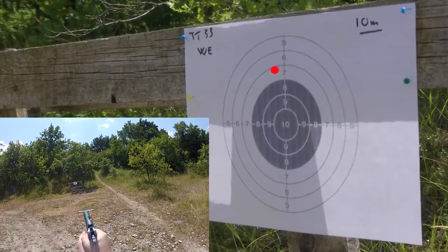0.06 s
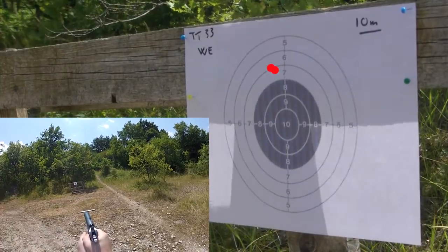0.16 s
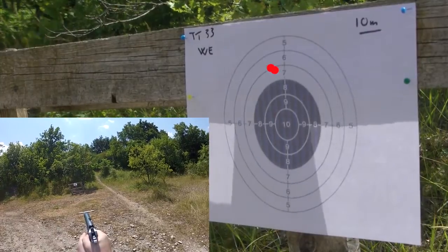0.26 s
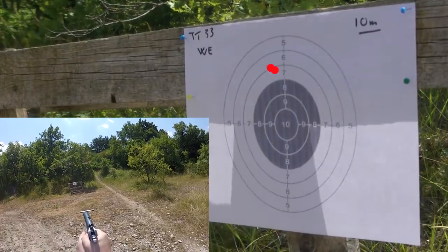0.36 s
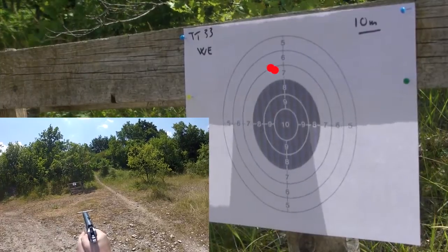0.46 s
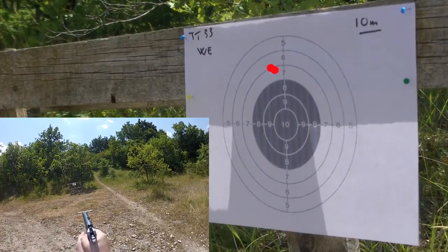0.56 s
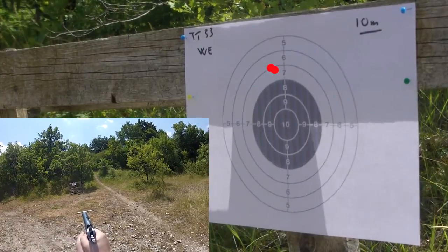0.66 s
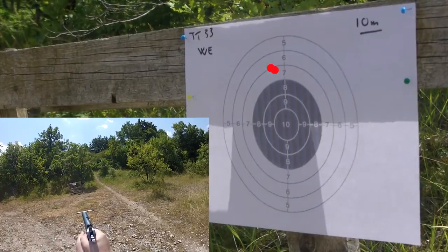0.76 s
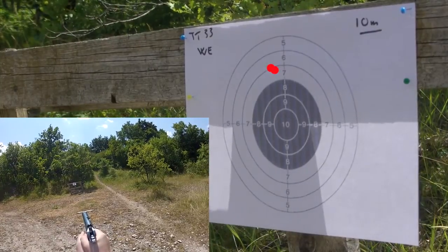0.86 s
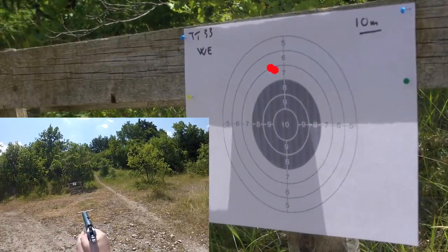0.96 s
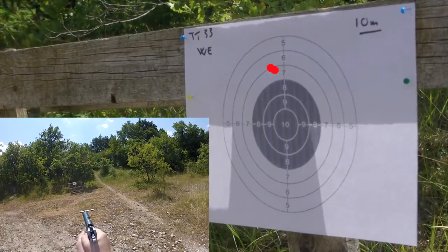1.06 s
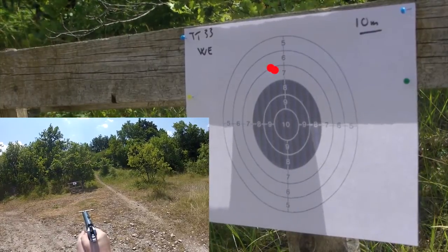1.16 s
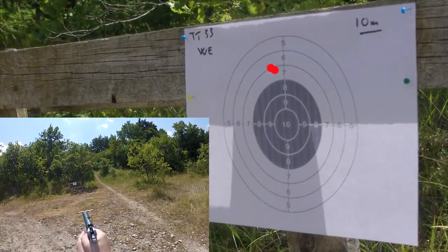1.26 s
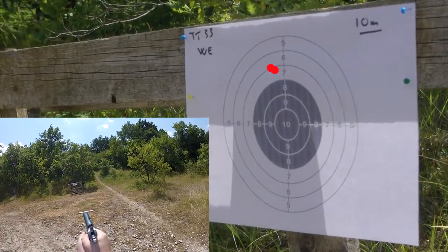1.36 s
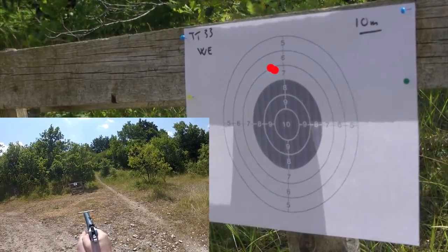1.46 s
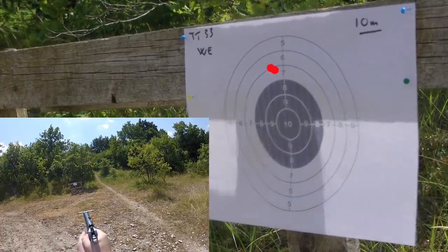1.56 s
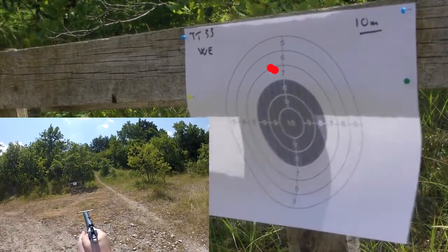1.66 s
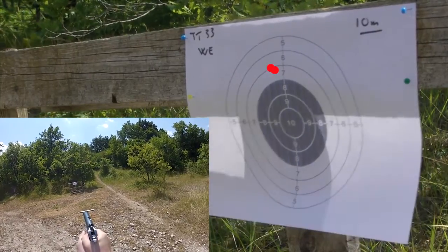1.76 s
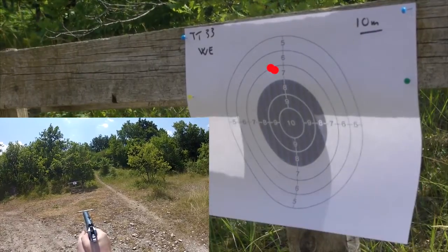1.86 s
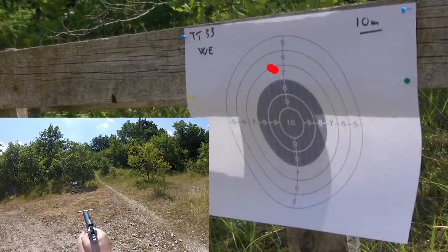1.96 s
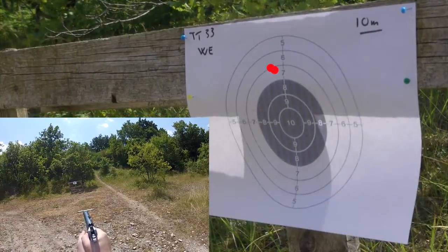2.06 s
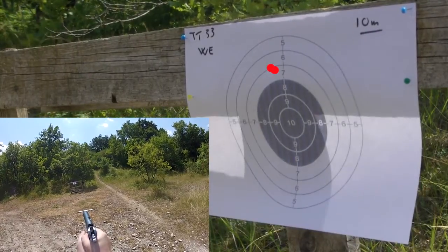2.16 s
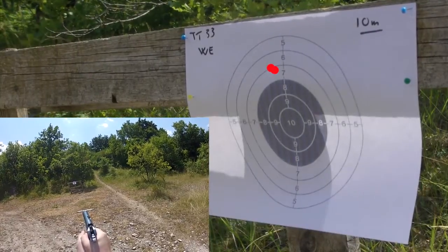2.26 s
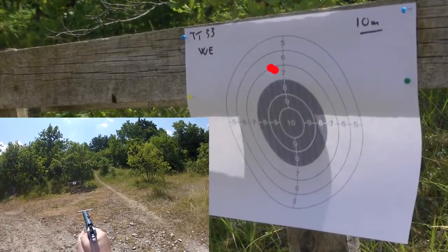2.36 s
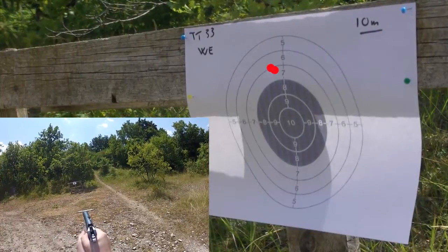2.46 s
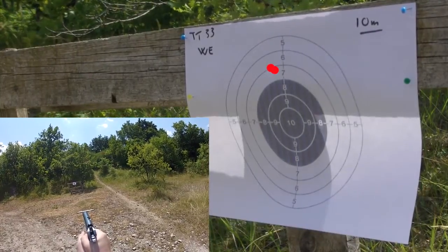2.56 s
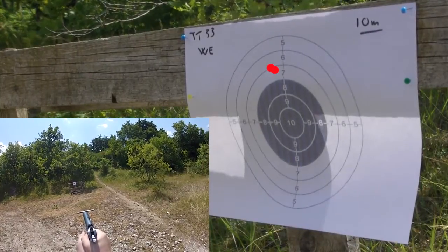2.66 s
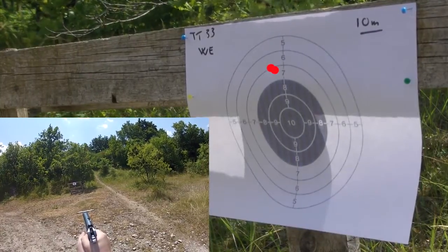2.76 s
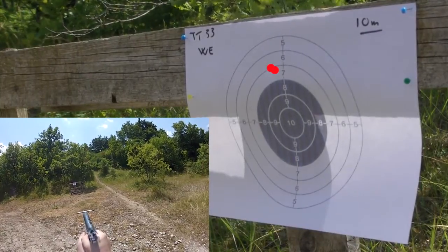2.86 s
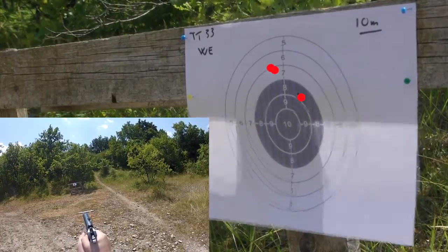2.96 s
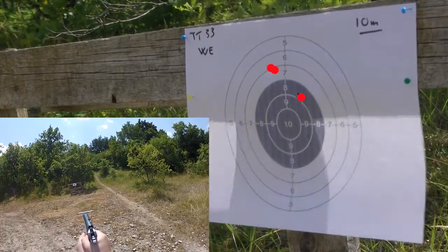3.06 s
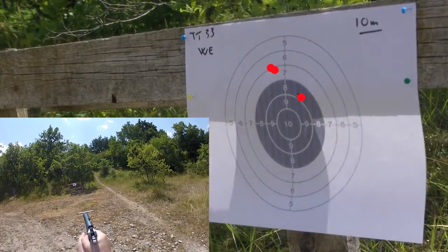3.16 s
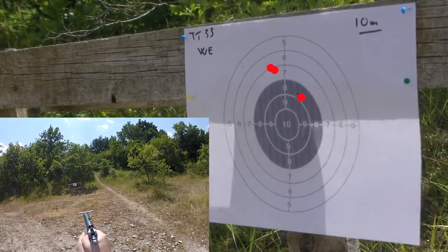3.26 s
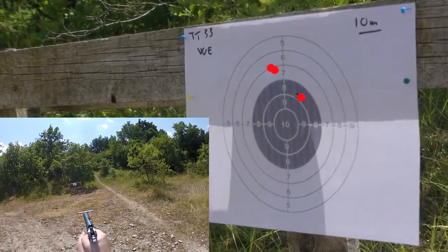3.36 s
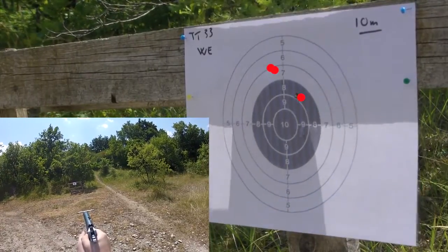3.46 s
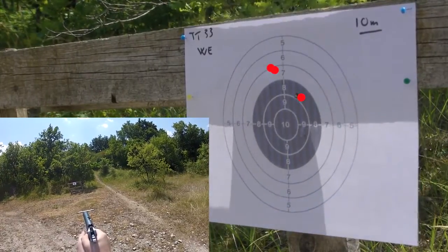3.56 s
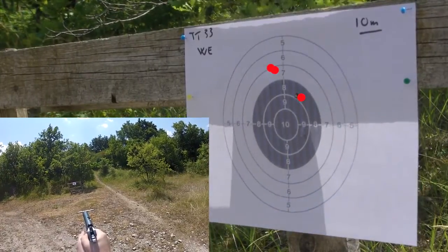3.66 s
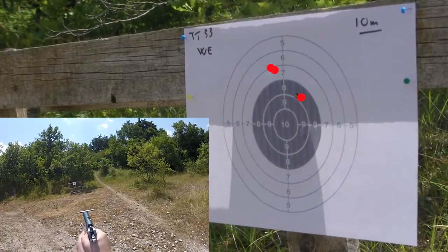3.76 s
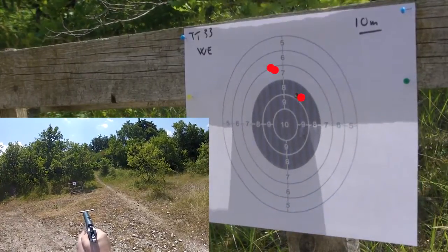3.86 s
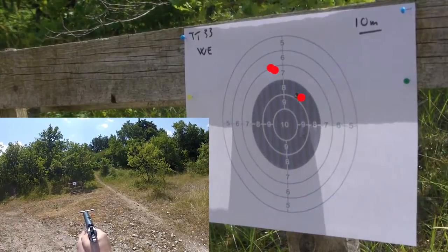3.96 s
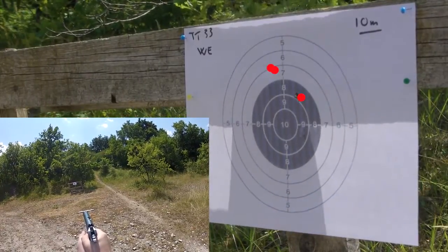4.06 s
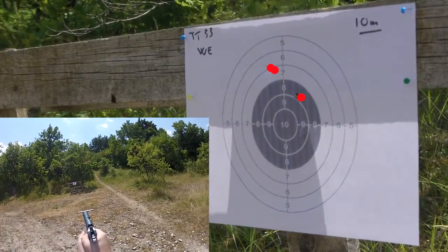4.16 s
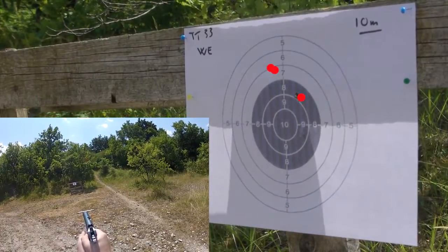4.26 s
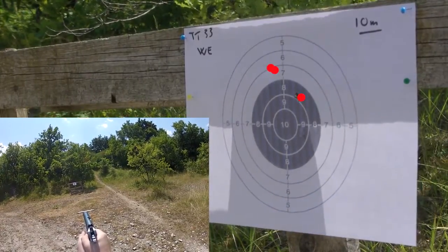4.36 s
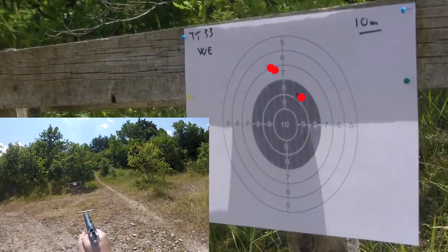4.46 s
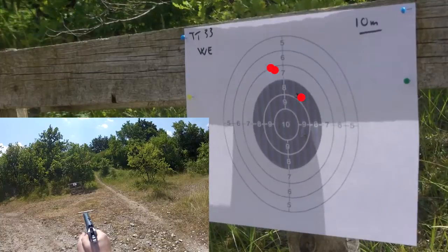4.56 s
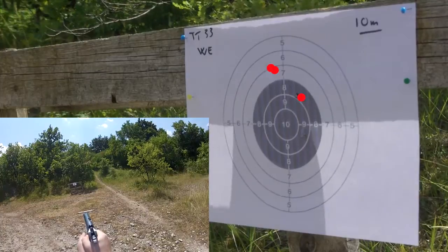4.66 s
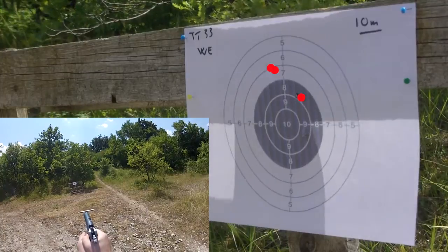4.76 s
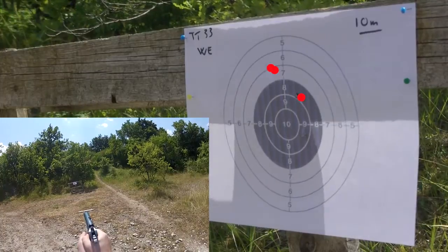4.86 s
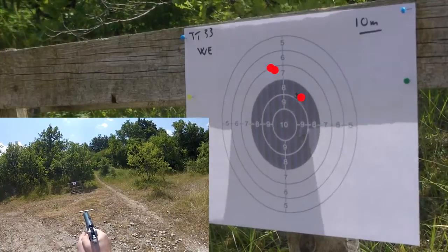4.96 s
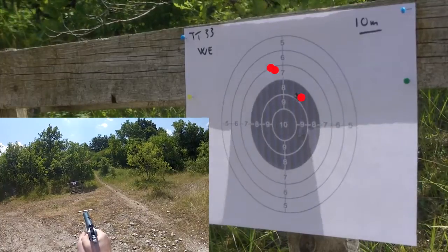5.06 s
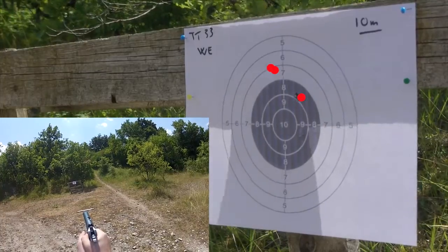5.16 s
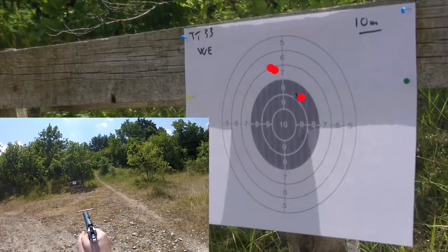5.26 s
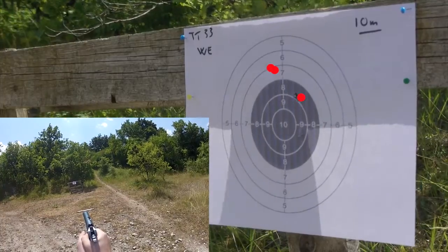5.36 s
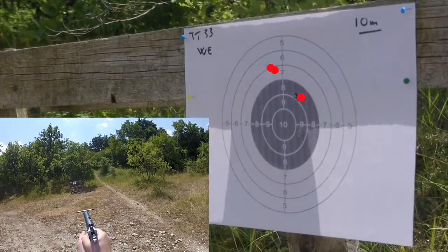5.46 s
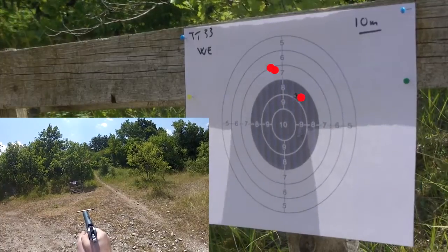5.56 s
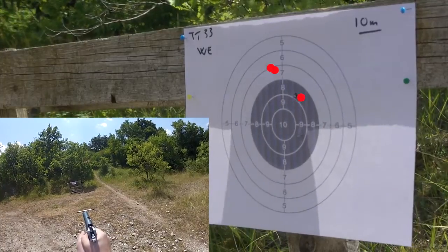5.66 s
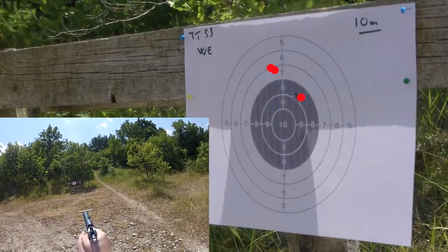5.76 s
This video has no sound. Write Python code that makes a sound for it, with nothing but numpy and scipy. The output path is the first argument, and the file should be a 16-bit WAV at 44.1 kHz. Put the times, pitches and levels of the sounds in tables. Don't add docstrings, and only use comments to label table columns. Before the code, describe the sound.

A gas-powered toy pistol snaps four times in dry scrub; pellets crack against a board three times, with wind rumble and rustling fragments between.

```python
import sys
import numpy as np
from scipy import signal
from scipy.fft import rfft, irfft
from scipy.io import wavfile
from scipy.ndimage import uniform_filter1d, minimum_filter1d

SR = 44100
rng = np.random.default_rng(int(sys.argv[2]) if len(sys.argv) > 2 else 0)


def how_loud(loudness_db):
    steps = np.asarray(loudness_db, float) / 20
    return 10 ** steps


def to_wav(sig):
    pcm = np.clip(np.atleast_2d(sig), -1, 1) * 32767
    pcm = np.round(pcm).astype(np.int16)
    wavfile.write(sys.argv[1], SR, pcm.T)


N = 255780

# freq_hz, density_db
FIELD_SIDE = [(35, -37.5), (60, -16), (160, -3), (250, -5), (323, -3), (785, -5.5), (2900, -21),
              (5590, -29), (9570, -30.5), (14200, -36), (16000, -35)]
FIELD_MID = [(35, -23), (60, -3.5), (156, -2.5), (268, -20.5), (323, -11), (749, -6), (1340, -9.5),
             (1820, -12.5), (12700, -22), (16000, -39.5)]
# freq_hz, level_db
WHINE = [(10490, -78), (13125, -76.5), (13965, -82)]
# freq_hz, density_db
HISS = [(120, -61), (200, -6.5), (289, -6.5), (366, -11), (401, -6.5), (1500, -13.5), (1680, -14),
        (4350, -14.5), (16000, -30)]

# time_s, level_db, left_minus_right_db
WIND = [(.15, -51, 7), (.5, -46.5, 12), (.67, -60, 7.5), (.85, -43.5, 1.5), (1.26, -46.5, 7),
        (1.36, -62, 9), (1.9, -50, 2.5), (2.32, -59, 4.5), (2.55, -44.5, 9), (2.93, -48.5, 4),
        (3.05, -40.5, 11), (3.38, -46.5, 13), (3.75, -51.5, 4), (4.25, -60.5, 4), (4.72, -50, 8),
        (5.0, -51.5, 3.5), (5.45, -60, 5), (5.8, -57, 2)]
# freq_hz, density_db
WIND_COLOUR = [(15, -19), (28, -7), (45, 0), (90, 0.5), (160, -6), (300, -25), (600, -85)]
# freq_hz, density_db
HEAVE = [(10, -6.5), (22, -4.5), (40, -0.5), (70, -18.5), (140, -70)]
# time_s, left_size, right_size, freq_hz, length_cycles
EDDIES = [(0.371, 0.077, 0.0016, 81, 0.92), (4.048, 0.011, 0.0039, 50.6, 1.5),
          (3.039, 0.016, 0.00098, 138, 3.5), (1.14, 0.038, 0.0035, 60.4, 1.3), (.86, 0.026, 0.029, 55, 1.4),
          (1.083, 0.046, -0.025, 253, 1.6), (1.287, 0.13, -0.079, 149, 0.8),
          (1.556, 0.027, -0.02, 180, 4.2), (2.641, .05, -0.011, 80, 1.5), (3.321, 0.027, 0.0091, 49.3, 1.4),
          (3.43, 0.023, -0.016, 55, 1.1), (3.578, 0.045, -0.031, 178, 1.6),
          (3.627, 0.033, -0.022, 164, 2.2), (3.756, .096, -.063, 165, 1.07),
          (3.845, 0.05, -0.029, 160, 0.59), (3.909, 0.074, -0.057, 142, 2.2),
          (4.947, .015, -0.036, 100, 1.6), (5.22, .02, -0.026, 120, 1.4), (5.6, 0.028, -0.017, 112, 2.7),
          (5.683, 0.091, -0.048, 140, 1.1)]
GUSTS_DB, BUFFET_DB, VEER_DB = 1, 3, 2

# start_s, rms_db, centre_hz, t60_s, left_minus_right_db
LEAVES = [(0.16, -37, 3500, .015, -3), (0.374, -47, 3220, 0.035, 8), (1.4205, -33.5, 3860, 0.0082, -6),
          (1.6195, -24.5, 7660, 0.0047, -6), (1.623, -31, 4050, 0.01, -2), (1.628, -36, 8100, 0.052, -2),
          (2.101, -45, 8800, 0.034, -6), (2.231, -49, 7920, 0.013, 11), (3.018, -51, 11500, 0.0084, -22),
          (3.398, -61, 9800, .078, -10), (4.469, -24, 4060, 0.018, -2), (4.575, -38, 5950, 0.15, -6),
          (4.61, -25.5, 8140, 0.035, -4.5), (4.615, -40, 5870, 0.3, -3)]

# freq_hz, t60_s
SCRUB_DECAY = [(300, 0.05), (1000, 1), (3000, 0.56), (4600, 0.53), (5700, 0.52), (7000, 0.5), (9000, 0.44),
               (13000, 0.28)]
# freq_hz, density_db
SCRUB_COLOUR = [(180, -11), (300, -3.5), (537, -7), (1280, -4.5), (3350, 2.5), (5610, 5), (12100, -2.5),
                (16000, -14)]

# start_s, peak_db, pitch_hz, ground_bounce_db
STRIKES = [
    (.1282, 1.5, 7000, -11),
    (1.4673, .5, 8000, -24),
    (2.9599, 2.5, 8500, -11),
]
# start_s, peak_db, pitch_hz, ground_bounce_db
RETURNS = [
    (.1727, -5.5, 6500, -11),
    (1.5125, -12, 7000, -24),
    (3.0047, -11, 5000, -1),
]
# wood_ring_db, debris_db, debris_hz, debris_t60_s, dust_db
AFTER = [
    [(-17.5, -11, 5000, 0.0067, -38.5), (-28, -15, 7300, 0.0019, -41)],
    [(-37, -34, 4400, 0.0069, -34.5), (-41, -13.5, 8500, 0.0053, -58.5)],
    [(-22, -15.5, 3100, 0.015, -42), (-3.5, -9.5, 1300, 0.0057, -27)],
]
# freq_hz, level_db, t60_s
PLANK = [(1640, -3.5, 0.041), (2220, 0, 0.017), (2940, 7, 0.01), (3640, 4, 0.018), (4600, -44, 0.023),
         (6700, 0, 0.0056)]
# freq_hz, level_db, t60_s
POST = [(1100, -7.5, 0.019), (1770, -38, 0.026), (2145, -10.5, 0.032), (3640, -9, 0.023),
        (4360, -28, 0.029), (6940, -5.5, 0.0083)]

# start_s, level_at_target_db
FIRED = [
    (.0219, -20),
    (1.3024, -18),
    (2.8539, -17.5),
    (4.4477, -18),
]
# gas_strength_db, scrub_echo_db
SHOTS = [(-1.6, -31), (-0.2, -29), (-1, -30), (-0.2, -27)]
# freq_hz, density_db
REPORT = [(300, -24), (1200, -15.5), (2500, 1.5), (6000, 1), (9000, -3.5), (12500, -14.5), (16000, -29)]
# delay_s, freq_hz, decay_s
MUZZLE_PUSH = (0.00198, 460, 0.0025)
BREECH_PUSH = (.0079, 143, 0.0027)
GRIP = [(0.47, -0.83, -1, -0.8), (.47, -0.23, -0.82, -0.7), (0.25, -0.24, -1.05, -0.7),
        (0.81, -.55, -0.77, -0.71)]
# start_s, left_size, right_size, freq_hz, decay_s
JOLTS = [
    (.1283, 0.19, 0.37, 540, 0.00057),
    (4.451, -0.61, -0.23, 137, .005),
]
# delay_s, level_db, rise_s, hold_s, t60_s
ACTION = [
    (-.0118, -25, 0.00026, 0.0008, 0.01),
    (-.0060, -14, 0.0041, 0.0004, 0.0064),
    (0, 6, 0.0005, 0.00094, 0.002),
    (.0036, 2.5, 0.0012, 0.00072, 0.0033),
    (.0075, 3, 0.000067, 0.00035, 0.0035),
    (0.0099, 0.5, 0.00053, 0.00098, .008),
    (0.0147, -4.5, 0.00016, 0.0005, 0.012),
    (0.017, -23.5, 0.0026, 0.0026, 0.078),
    (.0005, -7.5, .001, .015, 0.014),
]
# freq_hz, density_db
GAS = [(260, -3), (450, -2.5), (607, -12), (1040, -5), (1560, -10), (1700, -10.5), (2260, -15),
       (2470, -8.5), (3230, -8), (5140, -1), (12800, -8), (16000, -57)]
# freq_hz, width_hz, level_db
SLIDE = [(1030, 250, -1.5), (1946, 230, 2), (2325, 410, 2.5), (2970, 58, -3.5), (3880, 220, -9.5),
         (4740, 83, -8), (5800, 85, -17), (5890, 110, -24)]


def evened(x):
    return x / np.sqrt(np.mean(x ** 2) + 1e-20)


def read(points, hz):
    f, value = np.transpose(points)
    return np.interp(np.log(hz + 1), np.log(f + 1), value)


def add(mix, start_s, sound):
    start = round(start_s * SR)
    part = mix[..., start:start + sound.shape[-1]]
    part += sound[..., :part.shape[-1]]


def coloured(points, size=N, channels=2):
    spectrum = rfft(rng.standard_normal((channels, size)))
    gain = how_loud(read(points, np.fft.rfftfreq(size, 1 / SR)))
    return evened(irfft(spectrum * gain, size))


def smooth_noise(count, size):
    return evened(uniform_filter1d(rng.standard_normal(count), size=size))


def wander(size):
    return evened(uniform_filter1d(uniform_filter1d(rng.standard_normal(N), size=size), size=size))


def ring(x, hz, width_hz):
    return signal.lfilter(*signal.iirpeak(min(hz, SR * .45), hz / width_hz, SR), x)


def swell(t, rise_s, hold_s, t60_s):
    fall_s = np.maximum(t - rise_s - abs(hold_s), 0)
    return np.clip(t / rise_s, 0, 1) * how_loud(-60 * fall_s / t60_s)


def ports(pair, same, lag_s=0.):
    same = np.clip(same, 0, 1)
    left = np.roll(pair[0], round(lag_s * SR))
    right = same * pair[0] + np.sqrt(1 - same ** 2) * pair[1]
    return np.array([left, right])


def field():
    side = how_loud(-44.5) * coloured(FIELD_SIDE, channels=1)[0]
    mid = how_loud(-56.5) * coloured(FIELD_MID, channels=1)[0] - 0.18 * side
    t = np.arange(N) / SR
    whine = sum(2 * np.sqrt(2) * how_loud(db) * np.sin(2 * np.pi * hz * t) for hz, db in WHINE)
    return np.array([mid + side + whine, mid - side])


def hiss():
    return how_loud(-53.5) * ports(coloured(HISS), 0.54)


def wind():
    time_s, level_db, pan_db = np.transpose(WIND)
    t = np.arange(N) / SR
    db = np.interp(t, time_s, level_db) + BUFFET_DB * wander(size=800) + GUSTS_DB * wander(size=3000)
    pan_db = np.interp(t, time_s, pan_db) + VEER_DB * wander(size=2500)
    rumble = ports(coloured(WIND_COLOUR), 0.66) * [[1], [-1]]
    heave = how_loud(-6.5) * ports(coloured(HEAVE), 0.94)
    out = (rumble + heave) * how_loud([db + pan_db / 2 + 1.0, db - pan_db / 2 + 3.5])
    for at_s, left, right, hz, cycles in EDDIES:
        u = (t - at_s) * hz
        out += np.outer([left, right], np.cos(2 * np.pi * u) * np.exp(-(2 * u / cycles) ** 2))
    return out


def leaves():
    out, t = np.zeros((2, N)), np.arange(8000) / SR
    for start_s, db, hz, t60_s, pan_db in LEAVES:
        hold_s = min(0.16 * t60_s, 0.0029)
        noise = coloured([(hz / 14, -22), (hz / 4, -5), (hz, 0), (hz * 1.7, -9), (hz * 2.6, -34)], size=len(t))
        grain = how_loud(2.5 * smooth_noise(len(t), 30))
        shape = grain * swell(t, .0003, hold_s, t60_s)
        add(out, start_s, ports(noise, 0.54) * shape * how_loud([[db + pan_db / 2], [db - pan_db / 2]]))
    return out


def echo(fade):
    hz, t, z = signal.stft(coloured(SCRUB_COLOUR, size=SR), SR, nperseg=256)
    t60_s = (fade * read(SCRUB_DECAY, hz))[:, None]
    tail = signal.istft(z * how_loud(-60 * t / t60_s), SR, nperseg=256)[1]
    count = tail.shape[1]
    lumps = how_loud(2 * smooth_noise(count, 200))
    onset = np.clip(np.arange(count) / SR / 0.0085, 0, 1)
    return ports(tail, 0.38) * lumps * onset


def ducking(x, knee_db=-31, share=0.91):
    hold, climb_db_per_s, lag = round(.08 * SR), 33, 1 / (.004 * SR)
    power = uniform_filter1d((x ** 2).mean(0), size=441, origin=220)
    power_db = 10 * np.log10(abs(power) + 1e-12)
    cut_db = share * np.maximum(power_db - knee_db, 0)
    held_db = -minimum_filter1d(-cut_db, 2 * (hold // 2) + 1, origin=hold // 2)
    climb_db = np.arange(N) * climb_db_per_s / SR
    cut_db = np.maximum(np.maximum.accumulate(held_db + climb_db) - climb_db, 0)
    return how_loud(-signal.lfilter([lag ** 2], [1, 2 * (lag - 1), (1 - lag) ** 2], cut_db))


def strike(board, db, hz, bounce_db, wood_db, debris_db, debris_hz, debris_t60_s, dust_db):
    t = np.arange(4000) / SR
    u = t * hz / .45
    crack = np.sin(2 * np.pi * hz * t) * u * np.exp(1 - u)
    crack = crack + how_loud(bounce_db) * np.roll(crack, 57)
    wood = sum(how_loud(d - 60 * t / t60_s) * np.sin(2 * np.pi * f * t) for f, d, t60_s in board)
    spectrum = [(400, -30), (debris_hz / 3, -9), (debris_hz, 0), (12000, -10), (17000, -40)]
    noise = ports(coloured(spectrum, size=len(t)), 0.65)
    debris = how_loud(debris_db) * swell(t, .0003, .001, debris_t60_s)
    dust = how_loud(dust_db) * swell(t, .001, .002, .18)
    whole = how_loud(db) * (crack + how_loud(wood_db) * wood + noise * (debris + dust))
    return signal.lfilter(*signal.butter(3, 800, "high", fs=SR), whole)


def report():
    t = np.arange(2500) / SR
    shape = how_loud(1) * swell(t, .001, .0015, .014)
    shape += how_loud(-5) * swell(t - .0045, .0004, .001, .02)
    shape += how_loud(-16) * swell(t - .009, .002, .006, .04)
    return ports(coloured(REPORT, size=len(t)), .6) * shape


def push(hz, decay_s, start_rad=0.66):
    t = np.arange(1500) / SR
    return np.exp(-t / decay_s) * np.sin(2 * np.pi * hz * t + start_rad) * np.clip(t / 0.00026, 0, 1)


def action():
    t = np.arange(4096) / SR - .012
    jets = ports(coloured(GAS, size=len(t)), 0.68, 2 / SR)
    force = 0
    for delay_s, db, *shape in ACTION:
        uneven_db = 0.84 * rng.standard_normal((2, 1))
        force = force + how_loud(db + uneven_db) * swell(t - delay_s, *shape)
    force = force * how_loud(2.2 * smooth_noise(len(t), 24))
    metal = sum(how_loud(db) * ring(jets * force, hz, width_hz) for hz, width_hz, db in SLIDE)
    bore = evened(ring(ring(jets, 5400, 1100), 5400, 1100)) * swell(t, .0005, .002, .008)
    stop = np.exp(-((t - .0075) / .00008) ** 2)
    return how_loud(-8) * jets * force + how_loud(-5.5) * metal + how_loud(-10.5) * bore + how_loud(-10.0) * stop


def scene():
    near, far, cracks = wind() + leaves(), field(), np.zeros((2, N))
    for (start_s, far_db), (gas_db, echo_db), grip in zip(FIRED, SHOTS, GRIP):
        add(near, start_s + MUZZLE_PUSH[0], np.outer(grip[:2], push(*MUZZLE_PUSH[1:])))
        add(near, start_s + BREECH_PUSH[0], np.outer(grip[2:], push(*BREECH_PUSH[1:])))
        add(near, start_s - .012, how_loud(gas_db) * action())
        add(near, start_s + .012, how_loud(echo_db) * echo(0.9))
        add(cracks, start_s + .0455, how_loud(far_db) * report())
        add(far, start_s + .075, how_loud(echo_db + 2.0) * echo(1.38))
    for start_s, left, right, hz, decay_s in JOLTS:
        add(near, start_s, np.outer([left, right], push(hz, decay_s)))
    for board, hit, back, after in zip((PLANK, PLANK, POST), STRIKES, RETURNS, AFTER):
        add(cracks, hit[0], strike(board, *hit[1:], *after[0]))
        add(near, back[0], strike(board, *back[1:], *after[1]))
        add(near, back[0], how_loud(back[1] - 31) * echo(0.86))
    duck = ducking(cracks)
    return near + cracks + far * duck + hiss() * duck ** .25


def low_pass(x):
    return signal.sosfilt(signal.butter(12, 16320, fs=SR, output="sos"), x)


def record(dry):
    clipped = dry / (1 + abs(dry / .9) ** 6) ** (1 / 6)
    limited = signal.oaconvolve(clipped, signal.firwin(101, 16100, fs=SR)[None], "same")
    return low_pass(limited)


dry = scene()
out = record(dry)
to_wav(out)
```